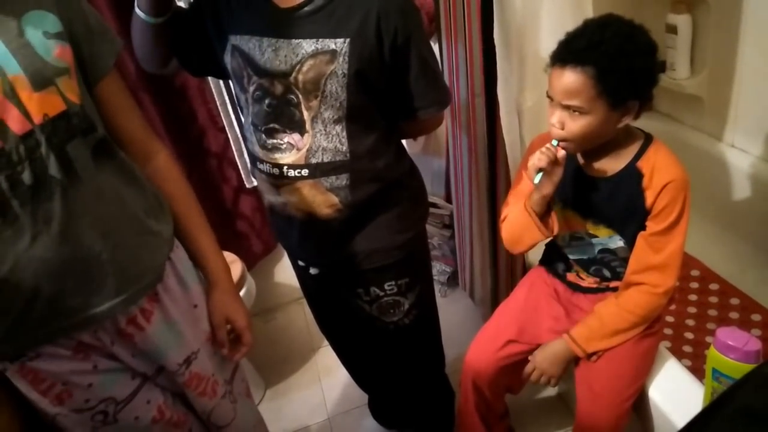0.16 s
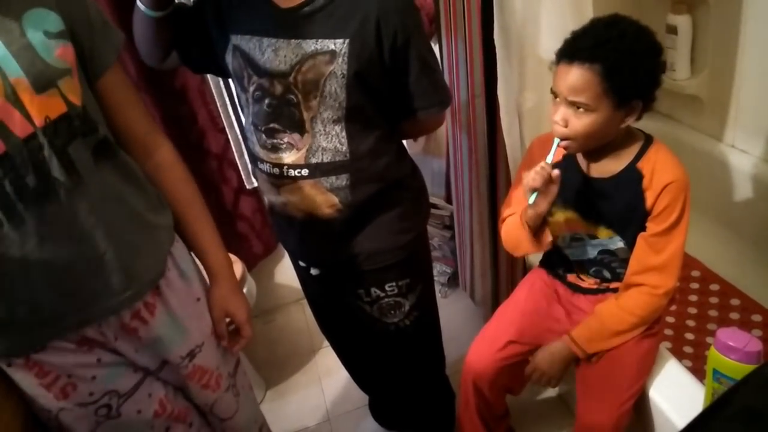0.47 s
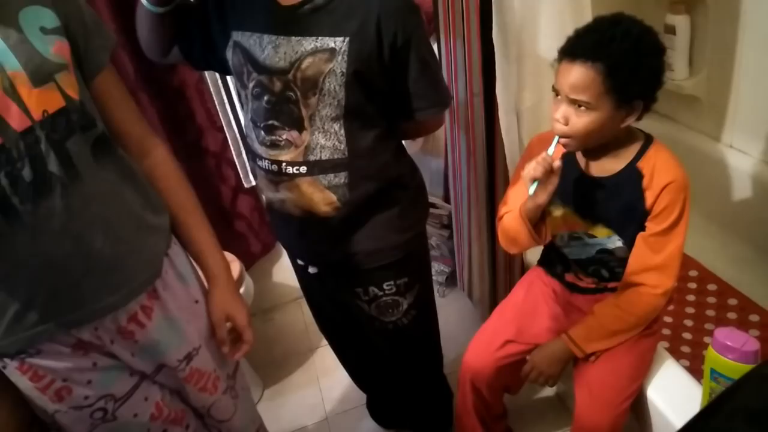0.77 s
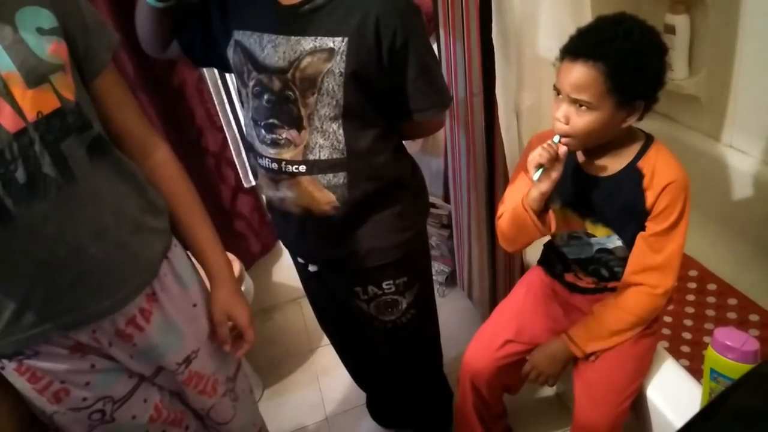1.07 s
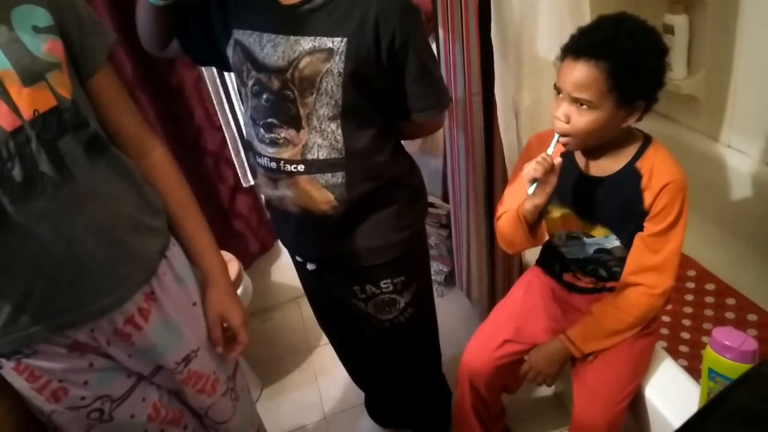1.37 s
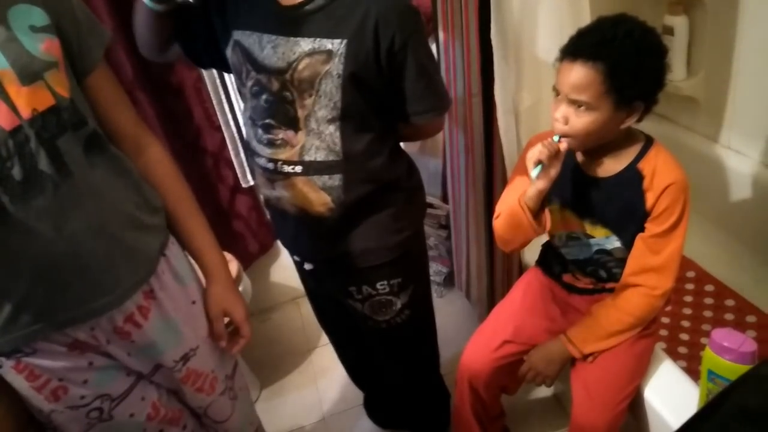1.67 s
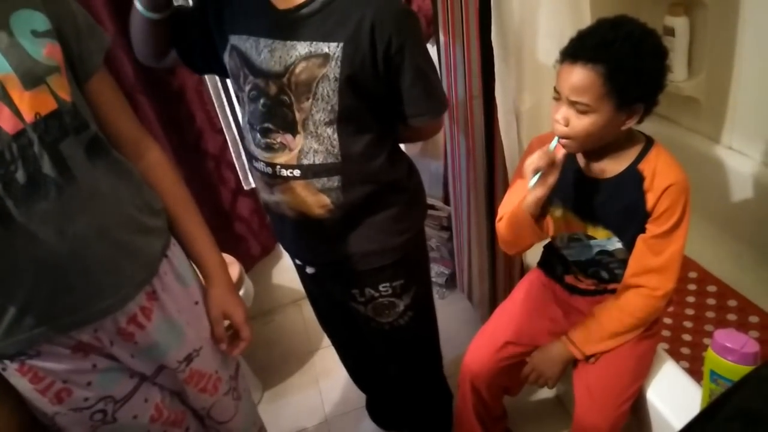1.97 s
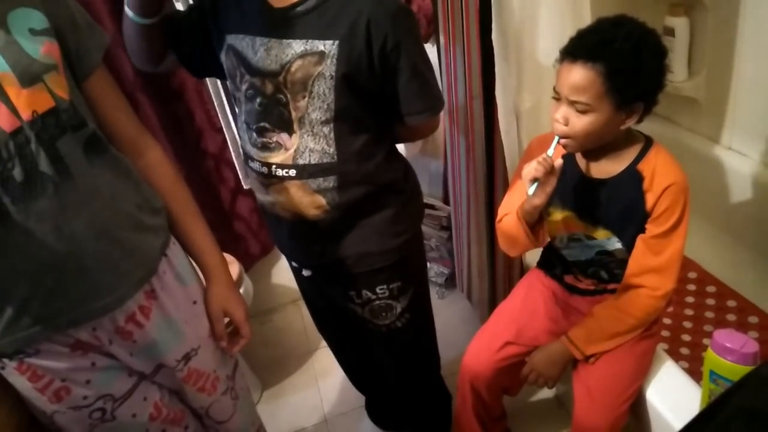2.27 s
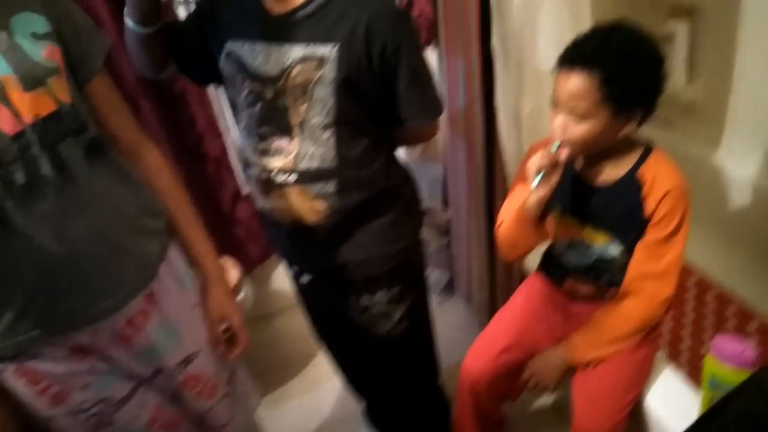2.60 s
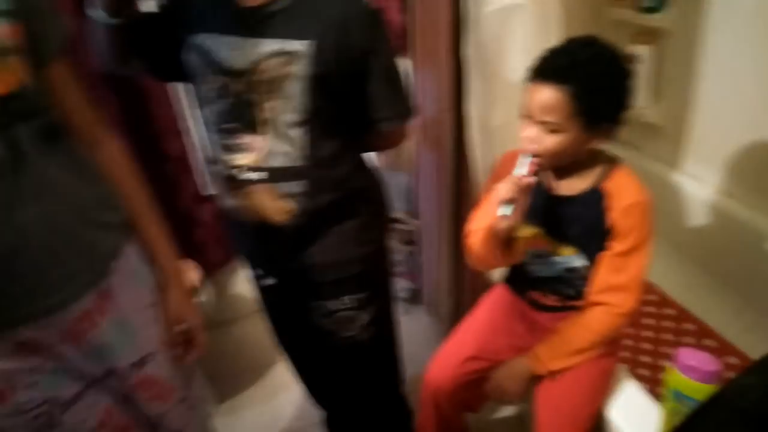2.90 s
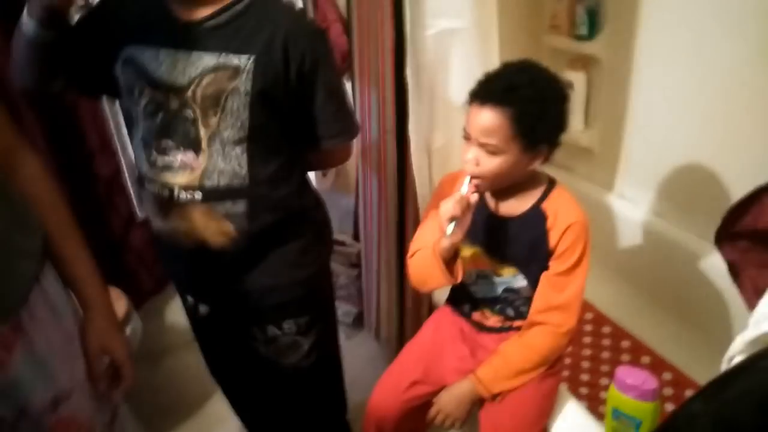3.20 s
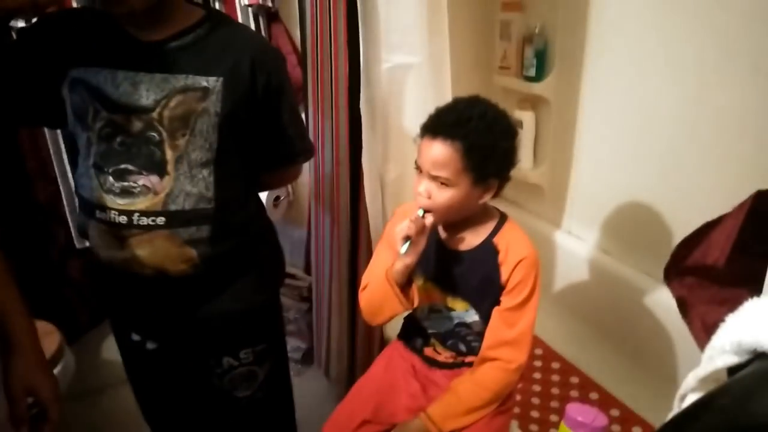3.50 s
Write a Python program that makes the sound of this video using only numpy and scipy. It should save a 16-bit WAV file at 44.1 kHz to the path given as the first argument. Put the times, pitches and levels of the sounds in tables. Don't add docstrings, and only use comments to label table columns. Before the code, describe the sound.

A manual toothbrush scrubs teeth in quick uneven strokes, with bristle ticks and a few knocks, in a small tiled bathroom; then the brushing stops and a finger rubs over the hand-held microphone.

```python
import sys
import numpy as np
from scipy import signal
from scipy.fft import rfft, irfft, next_fast_len
from scipy.io import wavfile

SR = 44100
rng = np.random.default_rng(int(sys.argv[2]) if len(sys.argv) > 2 else 0)


def to_wav(sig):
    pcm = np.clip(np.atleast_2d(sig), -1, 1) * 32767
    pcm = np.round(pcm).astype(np.int16)
    wavfile.write(sys.argv[1], SR, pcm.T)


def elevation(decibels):
    levels = np.asarray(decibels, float)
    return 10 ** (levels / 20)


N = 160965


def rms_one(x):
    return x / np.sqrt(np.mean(x ** 2) + 1e-20)


def butter(x, hz, kind, order=2):
    return signal.sosfilt(signal.butter(order, hz, kind, fs=SR, output="sos"), x + 1e-18)


def resonance(x, hz, width_hz):
    r = np.exp(-np.pi * width_hz / SR)
    zeros = np.array([1, 0, -1]) * (1 - r * r) / 2
    poles = [1, -2 * r * np.cos(2 * np.pi * hz / SR), r * r]
    return signal.lfilter(zeros, poles, x + 1e-18)


def drift(rate_hz):
    r = np.exp(-80 * np.pi * rate_hz / SR)
    noise = rng.standard_normal(N // 40 + 2002)
    slow = signal.lfilter([1], [1, -2 * r, r * r], noise)[2000:]
    return np.interp(np.arange(N) / 40, np.arange(len(slow)), rms_one(slow))


def grains(per_s, spread_db):
    size_db = spread_db * np.minimum(rng.exponential(1, N), 3.0)
    clicks = elevation(size_db) * rng.choice([-1, 1], N)
    return rms_one(clicks * (rng.random(N) < per_s / SR))


def coloured(x, spectrum, patchy_db):
    out = 0
    edges = 30 * 2 ** np.arange(0, 9.1, .5)
    hz, db = np.transpose(spectrum)
    for k, (low, high) in enumerate(zip(edges, edges[1:])):
        level_db = np.interp(np.log(low * high) / 2, np.log(hz), db)
        flicker_db = patchy_db * drift(31.0)
        out = out + elevation(level_db + flicker_db) * butter(x[k % 2], [low, high], "band")
    return rms_one(out)


def bristle_rub():
    wobble = elevation(2.5 * drift(13.5) + 2.5 * drift(210.0))
    flicks = grains(2000, 2.6) * wobble
    paste_hiss = elevation(1.5) * wobble ** .5 * rng.standard_normal(N)
    return rms_one(flicks + paste_hiss)


# middle in seconds, length in seconds, level in dB, mouth resonance in Hz,
# bristle brightness in dB.
BRUSH_STROKES = [(0.181, 0.11, -46, 1940, 2.5), (0.243, 0.065, -46.5, 2200, 3.5),
                 (0.343, 0.049, -36, 1330, 5.5), (0.42, 0.14, -38.5, 1510, 3), (0.51, 0.11, -39.5, 2300, 7),
                 (0.599, 0.076, -36.5, 1910, 9.5), (0.697, 0.093, -42.5, 1780, 7),
                 (0.796, 0.099, -36, 2100, 5.5), (0.901, 0.11, -37, 1900, 4), (0.996, 0.12, -38.5, 2130, 4),
                 (1.122, 0.12, -36.5, 1840, 8), (1.238, 0.16, -45.5, 1750, 2),
                 (1.361, 0.13, -40.5, 1830, 3.5), (1.495, 0.059, -43, 1600, 3.5),
                 (1.581, 0.091, -35, 1640, 4), (1.714, 0.13, -37.5, 1770, 4),
                 (1.816, 0.15, -42.5, 2000, -1), (1.968, 0.092, -34, 1080, 4.5),
                 (2.066, 0.072, -30.5, 1180, 10), (2.179, 0.095, -35, 1380, 8),
                 (2.276, 0.045, -31.5, 1330, 11), (2.369, 0.066, -39, 1450, 4), (2.456, 0.13, -38, 1430, 5),
                 (2.548, 0.072, -46, 1900, 3)]
# middle pitch in Hz, width in Hz, middle level in dB.
HEAD_RINGS = [(1300, 250, -6), (1650, 250, -3), (2060, 250, -5), (2600, 300, -3), (3200, 400, -3),
              (4030, 450, -5), (5200, 600, -8)]
# time in seconds, cheek resonance in Hz,
# front resonance in Hz, cheek level in dB, front level in dB.
MOUTH_SHAPE = [(0.1, 1470, 3320, 3, -1), (0.34, 1300, 3620, -14, 5), (0.45, 1320, 3200, -19, 5),
               (0.6, 1460, 3600, -34, 14.5), (0.72, 1480, 3800, -23, 11), (0.79, 880, 3920, -21, 6),
               (0.93, 1250, 4130, -3, 14), (1.1, 1730, 3300, -5, 4), (1.21, 1280, 3180, -22, -7),
               (1.36, 1460, 4000, -8, -10), (1.58, 1350, 4170, 14.5, 14), (1.66, 1250, 4100, -7, 0),
               (1.72, 1040, 4180, 5, 6), (1.84, 656, 3600, -13, -19), (1.96, 990, 4240, -20, 0),
               (2.18, 1140, 4100, -25, 5), (2.3, 1150, 4470, -3, 3), (2.5, 1200, 3830, -1, 3)]
# time in seconds, lowest frequency in Hz.
LIP_OPENING = [(0, 1150), (.72, 1220), (.79, 760), (.95, 1040), (1.1, 1380), (1.5, 1010), (1.72, 866),
               (1.84, 490), (2.0, 740), (2.5, 810)]


def brush():
    t, rub = np.arange(N) / SR, bristle_rub()
    mids, bright = np.zeros((2, N)), np.zeros(N)
    when, *mouth = np.transpose(MOUTH_SHAPE)
    lip_changes = rng.standard_normal((len(BRUSH_STROKES), 3, len(HEAD_RINGS)))
    for (s, length, db, hz, bright_db), change in zip(BRUSH_STROKES, lip_changes):
        i, j = max(int((s - .22) * SR), 0), int((s + .22) * SR)
        x = (t[i:j] - s) / (length * 1.25)
        x = x * (1 + 0.13 * np.sign(x))
        swell = np.cos(np.pi * np.clip(x, -.5, .5)) ** 2.2
        rest = elevation(-17.5) * np.exp(-x * x)
        scrub = rub[i:j] * elevation(db) * (swell + rest)

        broad = elevation(-7.5) * butter(scrub, 10000, "low") * [[1], [-1]]
        both = elevation(5.5) * resonance(scrub, hz, 390) + broad
        for k, (head_hz, width_hz, head_db) in enumerate(HEAD_RINGS):
            ring = resonance(scrub, head_hz * (1 + 0.062 * change[2, k]), width_hz)
            ring_db = head_db + 3.0 * change[:2, k:k + 1]
            both = both + ring * elevation(ring_db) * [[1], [(-1) ** k]]

        for side in (-1, 1):
            at = s + side * 0.9 * length
            cheek_hz, front_hz, cheek_db, front_db = [np.interp(at, when, c) for c in mouth]
            cheek = elevation(cheek_db) * resonance(scrub, cheek_hz, 122)
            front = elevation(front_db) * resonance(scrub, front_hz, 200)
            lowest_hz = np.interp(at, *np.transpose(LIP_OPENING))
            share = np.clip(.5 + side * x * 2, 0, 1)
            mids[:, i:j] += share * butter(both + cheek - front, lowest_hz, "high", order=5)
        bright[i:j] += elevation(bright_db) * scrub
    return elevation(7.5) * mids, elevation(14) * bright


# start in seconds, peak in dB, pitch in Hz.
TUFT_TICKS = [(0.3126, -29, 2990), (0.3255, -24.5, 1250), (0.3704, -27, 1640), (0.5267, -16, 3300),
              (0.5671, -16, 3630), (0.5962, -13, 1960), (0.7628, -18.5, 3840), (0.838, -15, 2200),
              (0.8701, -20, 3060), (0.885, -11, 3870), (0.9657, -15, 2100), (1.059, -25.5, 1950),
              (1.0702, -18.5, 2130), (1.0831, -17, 1870), (1.1799, -22, 1700), (1.3595, -20, 2000),
              (1.4797, -28, 1860), (1.557, -32, 1710), (1.568, -22, 1750), (1.593, -23, 1300),
              (1.6234, -15.5, 2820), (1.7053, -16.5, 1270), (1.923, -23.5, 4120), (1.9412, -17, 1170),
              (2.0446, -16.5, 2180), (2.1498, -16, 2300), (2.172, -9.5, 4200), (2.2717, -13, 1320),
              (2.346, -19, 1360), (2.3587, -17, 1350)]


def ticks():
    out, tail = np.zeros(N), np.arange(1500) / SR / .0018
    for (s, db, hz), noise in zip(TUFT_TICKS, rng.standard_normal((len(TUFT_TICKS), 1500))):
        burst = noise * np.exp(-tail) * np.minimum(2 * tail, 1)
        out[int(s * SR):][:len(tail)] += elevation(db + 12.5) * resonance(burst, hz, 450)
    return butter(out, 840, "high", order=4)


def bursts(events, decay_s):
    out, tail = np.zeros(N + 2000), np.arange(2000) / SR / decay_s
    for (s, db), noise in zip(events, rng.standard_normal((len(events), 2000))):
        out[int(s * SR):][:len(tail)] += elevation(db) * noise * np.exp(-tail) * np.minimum(2 * tail, 1)
    return out[:N]


# start in seconds, peak in dB.
HEAD_KNOCKS = [
    (0.0034, -23),
    (0.0335, -49),
    (0.0913, -51),
    (1.1782, -29),
    (2.2745, -10.5),
    (2.359, -41),
    (2.5245, -6.5),
]


def knocks():
    return elevation(-1) * butter(bursts(HEAD_KNOCKS, .004), [720, 3300], "band")


# start in seconds, peak in dB.
TUFT_SNAPS = [(0.3404, -4.5), (0.3438, -13), (0.3838, -11), (0.4668, -24), (0.566, -14), (0.5879, -20),
              (0.752, -24), (0.9167, -11), (1.0715, -26), (1.0989, -22), (1.1375, -13), (1.1531, -11),
              (1.5648, -14), (1.5944, -30), (1.9808, -9), (2.0472, -1.5), (2.049, -11), (2.069, -11),
              (2.07, -10), (2.1465, -17), (2.1715, -12), (2.2015, -6.5), (2.2712, -8), (2.4717, -28),
              (2.6485, -17), (3.0283, -10)]


def snaps():
    return elevation(13.5) * bursts(TUFT_SNAPS, .0007)


def hand_echo(x):
    late = np.arange(N) - SR * (.00097 + .00007 * drift(2.27))
    return np.array([v + .45 * np.interp(late, np.arange(N), v) for v in x])


# time in seconds, level in dB, pressure in dB,
# speed in dB, leak to the right in dB.
FINGER_SLIDE = [
    (2.56, -40, -25, 7.5, -19), (2.592, -43, -25, 5.5, -23), (2.668, -36, -25, 5.5, -26),
    (2.734, -32.5, -20, 5, -56), (2.808, -38, -25, 5, -21), (2.842, -36.5, -34, 3, -40),
    (2.916, -36, -48, 3.5, -15), (2.978, -38.5, -6, -1.5, -53), (2.99, -35.5, -5, 0, -26),
    (3.0, -39.5, -44, -5, -35), (3.018, -28.5, 3.5, 2.5, -13), (3.038, -35, -16, 9.5, -6),
    (3.06, -34.5, -2, -7.5, -33), (3.172, -26.5, -7, 5.5, -24), (3.28, -34, -5, 2, -16.5),
    (3.462, -34.5, -20, 5, -70), (3.584, -35.5, -19, 6.5, -27), (3.65, -36.5, -37, 11, -11)]
# frequency in Hz, level in dB per Hz.
SKIN_SPECTRUM = [(100, -8), (300, -8), (900, -4), (2200, 2), (4000, -1), (7500, -6)]


def slide():
    before_touch = [(FINGER_SLIDE[0][0] - .03, -90, 0, 0, -16)]
    s, *columns = np.transpose(before_touch + FINGER_SLIDE)
    t = np.arange(N) / SR
    db, press_db, speed_db, leak_db = [np.interp(t, s, c) for c in columns]
    skin = rng.standard_normal((2, 2, N)) + elevation(-6) * grains(1300, 4.7)
    hiss = coloured(skin, SKIN_SPECTRUM, 2)
    low = butter(hiss, 650, "low")
    pressed = hiss - low + elevation(press_db + 11.5) * low
    mids = elevation(db + 6.5) * pressed * elevation([0 * db, leak_db])
    air_db = 16.5 - 11.5 * (np.arange(N) > 3.05 * SR)
    air = elevation(air_db) * butter(skin[1, 1], 14200, "high")
    return mids, elevation(db + speed_db + 3.5) * (skin[0, 0] + air)


# start in seconds, peak in dB, left lead in dB, pitch in Hz,
# time to fall 60 dB in seconds.
CASE_BUMPS = [(0.336,-45,31,344,0.31), (0.339,-34,7.5,180,0.12), (0.401,-42.5,4,78,0.35),
              (.48,-57.5,-8.5,70,0.6), (0.823,-49,3,370,0.084), (0.959,-44.5,6.5,309,0.28),
              (1.471,-52,2,348,0.16), (1.727,-48,25,392,0.16), (1.81,-32,4,630,.12), (1.816,-36,2,347,0.29),
              (1.941,-40,7,412,0.24), (2.029,-37.5,5.5,400,0.12), (2.273,-39.5,8,370,0.094),
              (2.462,-44,5,420,0.89), (2.523,-25.5,7,550,0.035), (2.663,-34.5,18,425,0.089),
              (2.889,-39.5,12,310,0.049), (3.006,-20,25,135.4,0.11), (3.149,-23.5,27,191,0.067)]


def bumps():
    out, t = np.zeros((2, N + SR)), np.arange(SR // 4) / SR
    noises = rng.standard_normal((len(CASE_BUMPS), 2, SR // 4))
    for (s, db, lead_db, hz, t60), noise in zip(CASE_BUMPS, noises):
        fade = elevation(-60 * t / t60) * np.minimum(t / 0.0027, 1)
        overtone = elevation(-17) * fade * np.sin(2 * np.pi * 1.1 * hz * t)
        ring = fade * (np.sin(2 * np.pi * hz * t) + overtone)
        rattle = rms_one(butter(noise, [0.77 * hz, 1.93 * hz], "band", order=3))
        rattle = elevation(-9.5) * rattle * np.exp(-t / 0.043) * np.minimum(t / 0.0035, 1)
        bump = elevation(db) * (ring * [[1], [-1]] + rattle) * elevation([[0], [-lead_db]])
        out[:, int(s * SR):][:, :len(t)] += bump
    return out[:, :N]


def port(x):
    x = butter(butter(x, 8090, "high"), 12970, "low", order=4)
    return resonance(x, 11380, 690) + elevation(-6) * x


# time in seconds, right level in dB.
FACING_RIGHT = [
    (0, -7),
    (.4, 0.5),
    (1.0, -1),
    (1.5, -2.5),
    (2.0, 0),
    (2.599, -2),
]


def right_port(x):
    facing_db = np.interp(np.arange(N) / SR, *np.transpose(FACING_RIGHT))
    ahead = np.arange(N) + 0.000725 * SR
    return elevation(facing_db) * np.interp(ahead, np.arange(N), x)


def tiles(x):
    size = next_fast_len(N + SR)
    hz, spectrum, out = np.fft.rfftfreq(size, 1 / SR), rfft(x, size), np.zeros((2, N))
    for k, lag in enumerate(rng.uniform(.006, .022, 16)):
        loss = elevation(-60 * lag / 0.15 * (3.0 + hz / 32000))
        loop = loss * np.exp(-2j * np.pi * hz * lag)
        out[k % 2] += irfft(spectrum * loop / (1 - loop), size)[:N] * (-1) ** (k // 2)
    return out


# frequency in Hz, level in dB per Hz.
ROOM_SPECTRUM = [(30, -2), (70, -6.5), (200, -18.5), (800, -24), (1200, -7.5), (3000, -6), (6000, -12),
                 (11500, -14.5)]


def room_tone():
    return elevation([[-48.5], [-54]]) * coloured(rng.standard_normal((2, 2, N)), ROOM_SPECTRUM, 3.0)


def scene():
    mids, bright = brush()
    rub, rub_bright = slide()
    mids = hand_echo(mids + ticks()) + knocks()
    bright = bright + elevation(-11) * tiles(bright)[0] + snaps() + rub_bright
    mids = mids + elevation(-6.5) * tiles(mids[0])
    mids[1] = right_port(mids[1])
    out = mids + rub + room_tone()
    out[1] = butter(out[1], 4460, "low", order=5)
    return out + port(bright) * elevation([[0], [-95]]) + bumps()


def band_limit(x):
    return signal.sosfilt(signal.butter(12, 15720, fs=SR, output="sos"), x)


def record(dry):
    soft = 1.15 * np.tanh(butter(dry, 13200, "low", order=4) / 1.15)
    return band_limit(butter(soft, 55.0, "high"))


dry = scene()
out = record(dry)
to_wav(out)
```